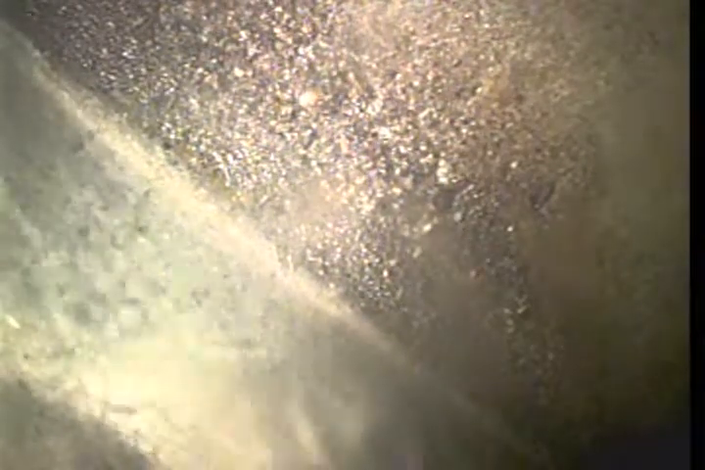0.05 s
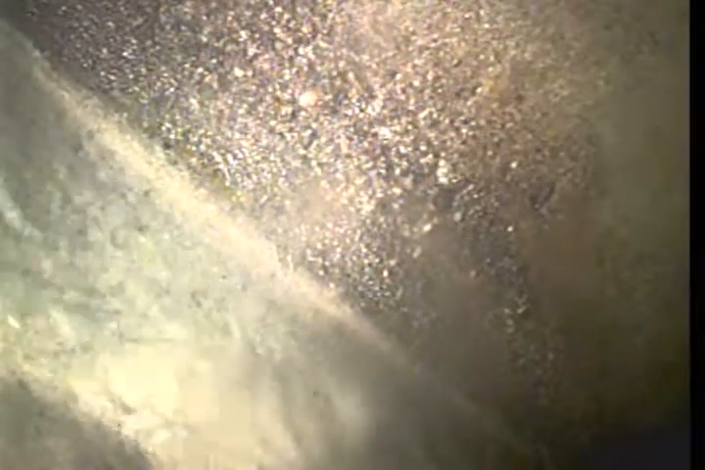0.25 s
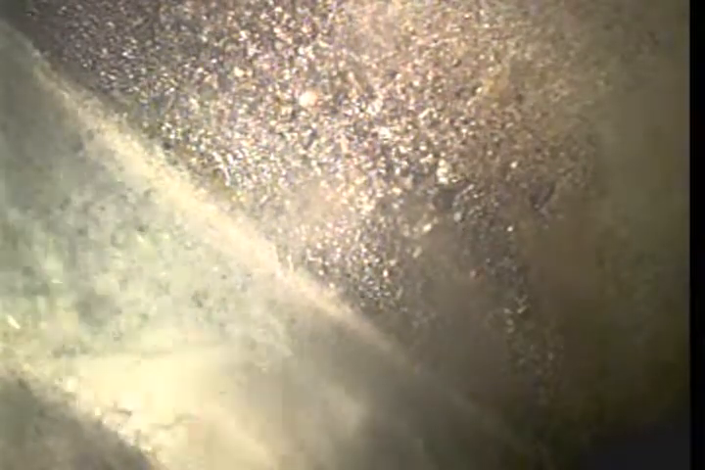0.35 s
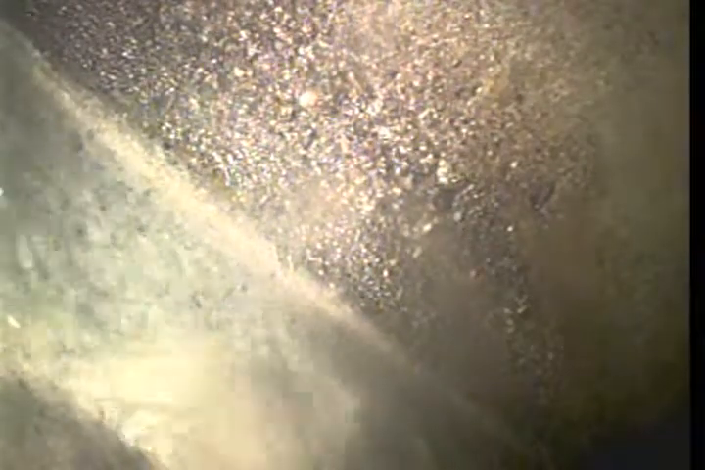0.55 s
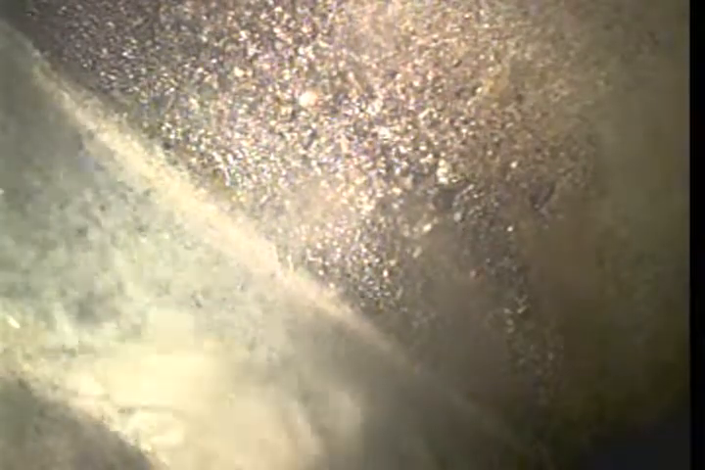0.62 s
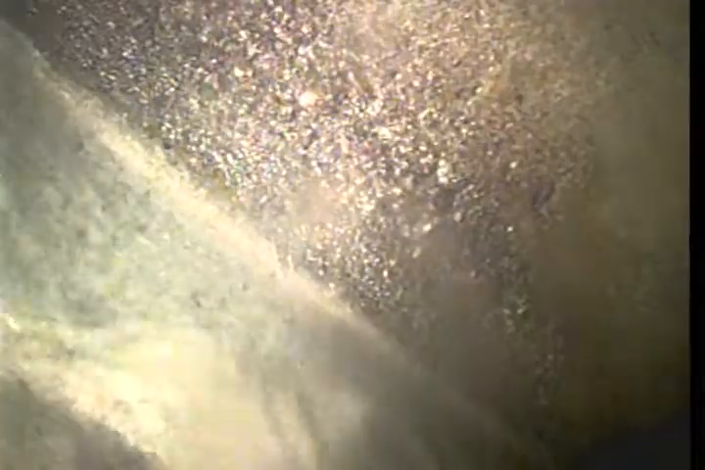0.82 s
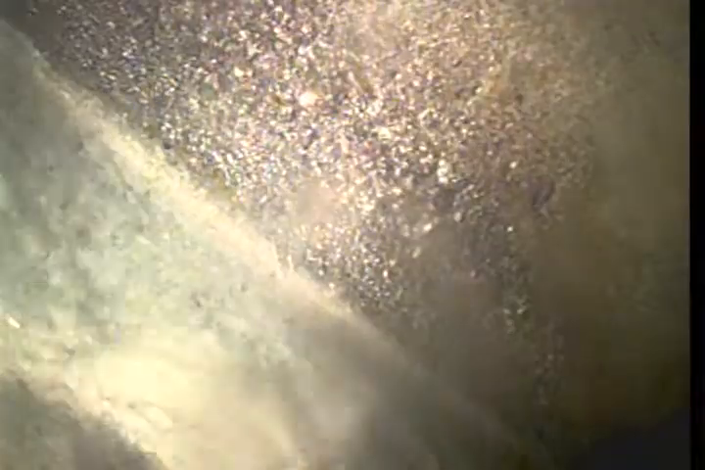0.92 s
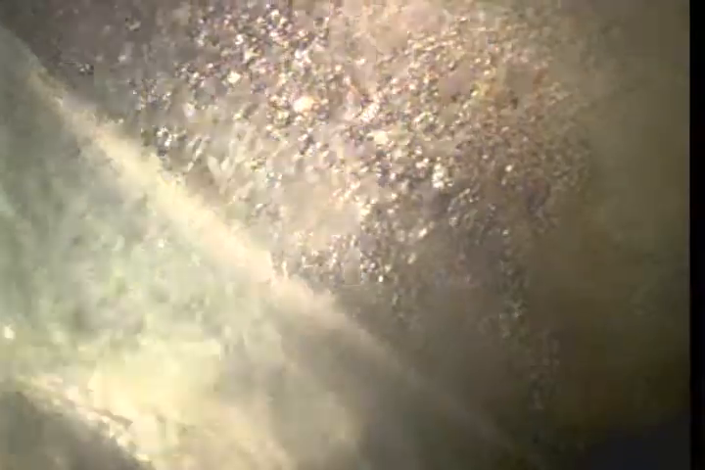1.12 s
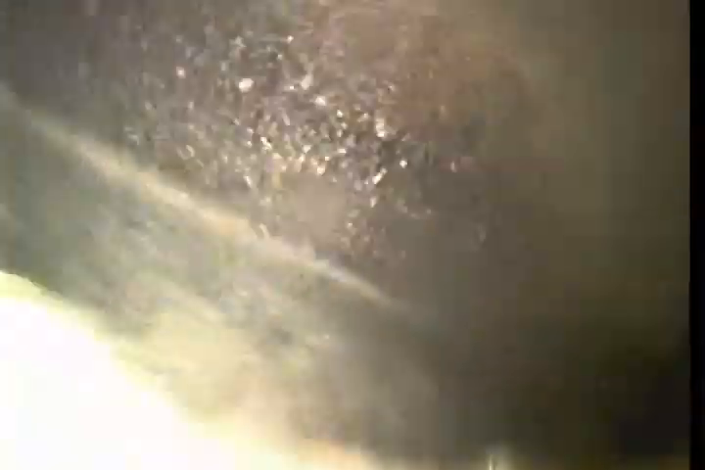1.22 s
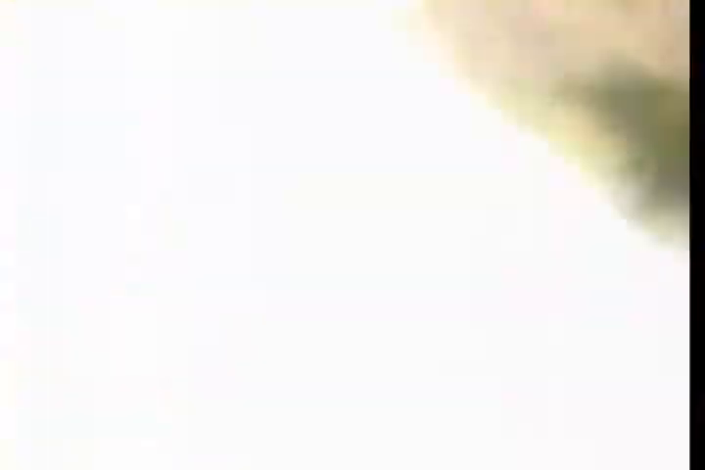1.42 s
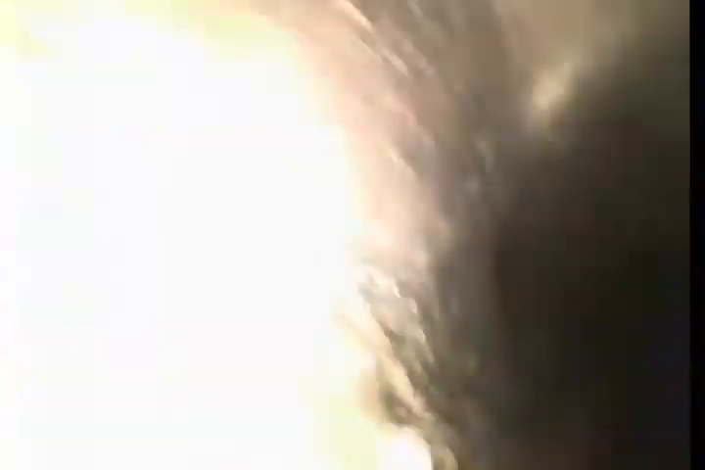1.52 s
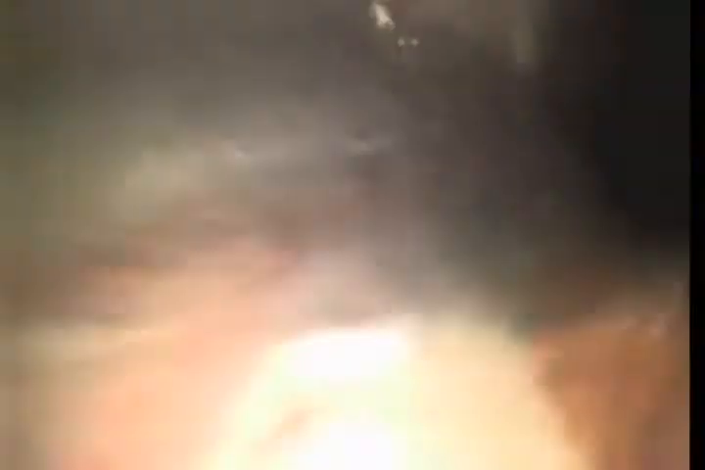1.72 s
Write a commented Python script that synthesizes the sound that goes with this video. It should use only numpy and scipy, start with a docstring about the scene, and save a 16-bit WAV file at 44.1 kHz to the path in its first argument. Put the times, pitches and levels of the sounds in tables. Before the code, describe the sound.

A push cable ticks twice against a drain pipe, then knocks hard with a low hollow boom that overloads the small muffled microphone; weaker bumps follow, then quiet sliding friction over hiss and a few dull taps.

```python
"""Cable drawn back through a drain pipe

A push cable clicks against its guide, bumps the reel's frame and makes the reel boom: decaying modes.
One sharp knock near 0.32 s does all three at once; hollow pipe resonances ring on as single sines.
From about 1.07 s the cable slides: coloured noise with two narrow resonances, over a hiss that rises again.
A narrow-band inspection recorder with a hissing floor picks it up and overloads on the knock."""
import sys
import numpy as np
from scipy.fft import rfft, irfft, next_fast_len
from scipy.io import wavfile
from scipy.ndimage import map_coordinates

SR = 44100
rng = np.random.default_rng(int(sys.argv[2]) if len(sys.argv) > 2 else 0)


def persist_wave(psi):
    """Save psi, clipped to +-1, as 16-bit WAV."""
    counts = np.round(np.clip(psi, -1, 1) * 32767).astype(np.int16)
    wavfile.write(sys.argv[1], SR, np.atleast_2d(counts).T)


N = 77175

RING_T = np.arange(SR // 2) / SR  # time axis of one contact, in seconds
TAIL_DB, TAIL_T60_S = -18, 0.29  # weak ring-out of a contact, relative to its peak


def amp(db):
    """Level law: decibels to an amplitude ratio."""
    return 10 ** (np.asarray(db) / 20)


def unit(x):
    """Normalization by mean power: scaled to rms 1."""
    return x / np.sqrt(np.mean(x ** 2) + 1e-20)


def curve(rows):
    """Linear interpolation: one value per sample from (seconds, value) rows."""
    return np.interp(np.arange(N) / SR, *np.transpose(rows))


def filtered(x, response):
    """Linear filtering: the spectrum of x times a response of frequency."""
    padded = next_fast_len(len(x) + 8192)
    spectrum = rfft(x, padded) * response(np.fft.rfftfreq(padded, 1 / SR))
    return irfft(spectrum, padded)[:len(x)]


def noise(spectrum, size, shade=np.zeros_like):
    """Spectral shaping: white noise coloured by (Hz, dB) rows plus a shade in dB, at rms 1."""
    f, db = np.transpose(spectrum)

    def colour(hz):
        level_db = np.interp(np.log(hz + 1), np.log(f), db) + shade(hz + 1)
        return amp(level_db) * (hz < 1.1 * f[-1])

    return unit(filtered(rng.standard_normal(size), colour))


def ring(modes, wash, wash_db, shade=np.zeros_like):
    """Modal superposition: sines of random phase in a wash of denser modes, not yet decaying."""
    tones = sum(amp(db + shade(hz)) * np.sin(2 * np.pi * (hz * RING_T + rng.random()))
                for hz, db in modes)
    dense_modes = noise(wash, len(RING_T), shade)
    return unit(unit(tones) + amp(wash_db) * dense_modes)


def envelope(rise, t60, hold=0, tail_db=TAIL_DB):
    """Two-stage exponential decay: linear rise, hold, main decay and a weak tail, added in power."""
    after = np.maximum(RING_T - rise - hold, 0)

    def fade(seconds):
        return np.exp(-np.log(1000) * after / seconds)  # falls 60 dB in the given seconds

    return np.minimum(RING_T / rise, 1) * np.hypot(fade(t60), amp(tail_db) * fade(TAIL_T60_S))


def add(out, s, sound):
    """Linear superposition: mixes a sound in at s seconds."""
    part = out[round(s * SR):][:len(sound)]
    part += sound[:len(part)]


def hiss():
    """Stationary noise under a gain curve: a hiss that drifts in level over a steady rumble."""
    # Spectra of the hiss and of the low rumble. Each row: frequency in Hz, density in dB per Hz.
    hiss_colour = [(600, -17), (1420, -5), (1750, -15.5), (2300, -6.5), (2770, -2.5), (3100, -5.5),
                   (3600, -11), (4000, -22), (4400, -33)]
    rumble_colour = [(30, -3), (100, -2.5), (200, 4.5), (300, -1), (600, -6.5), (790, -7.5), (1150, -17),
                     (1420, -24), (1900, -28.5)]
    # Course of the hiss. Each row: time in seconds, level in dB.
    hiss_level = [(0, -60.5), (.12, -57.5), (.4, -53), (.55, -51.5), (.82, -50), (.95, -40.5), (1.04, -65),
                  (1.75, -55)]
    rumble_db = -52.5
    floor = amp(curve(hiss_level)) * noise(hiss_colour, N)
    return floor + amp(rumble_db) * noise(rumble_colour, N)


def clicks():
    """Impact excitation: the cable ticks on the guide and rings it; each tick has its own upper limit."""
    # Hard contacts. Each row: start in seconds, rise in seconds, main decay t60 in seconds,
    # level of the guide's ring in dB, level of the cable's tick in dB, top of the tick in Hz.
    contacts = [(0.142, 0.00054, 0.016, -19.5, -24, 3500), (0.1451, 0.0011, 0.073, -26, -23, 3400),
                (0.219, 0.0086, .09, -32, -36, 3500), (0.2314, 0.0051, 0.056, -16, -21, 3540),
                (0.242, 0.01, 0.14, -23, -25.5, 3550), (0.314, 0.0025, 0.11, -28, -24.5, 4000),
                (.319, .003, 0.086, -24, -15.5, 4300), (0.329, .002, 0.098, -19, -14.5, 4200),
                (.362, 0.0041, 0.056, -34, -23.5, 4080), (.609, .004, 0.2, -44.5, -41, 3490),
                (.650, .002, 0.027, -33.5, -35, 3630), (.724, .001, 0.13, -41, -58.5, 3500),
                (.885, .02, 0.6, -45.5, -43, 3500), (.923, 0.011, 0.097, -26, -23, 4220),
                (1.668, .005, 0.03, -50, -48, 3450)]
    # Modes of the guide and the cable's own high modes. Each row: frequency in Hz, level in dB.
    guide_modes = [(790, -14), (876, -5.5), (985, 1), (1405, -2.5), (1575, -3), (1720, -4.5)]
    cable_modes = [(2675, -8.5), (2885, -1), (3075, -4.5), (3215, -0.5), (3446, -2), (3770, 0)]
    # Dense ringing of guide and cable. Each row: frequency in Hz, density in dB per Hz.
    guide_wash = [(30, -5), (250, -23), (450, -10.5), (620, -13), (860, -0.5), (1180, -9.5), (1450, -3.5),
                  (1750, -14), (2400, -15), (3600, -41.5)]
    cable_wash = [(300, -50.5), (1500, -10.5), (2200, -11), (2650, 2.5), (3000, 2), (3300, -0.5),
                  (3700, 3.5), (3950, -7.5), (4400, -9.5)]
    wash_db = 4  # dense ringing against the discrete modes, in both bodies
    rolloff = 14  # order of the fall above a tick's top
    out = np.zeros(N)
    for s, rise, t60, ring_db, tick_db, top_hz in contacts:
        shade = lambda hz: -20 * np.log10(np.hypot(1, (hz / top_hz) ** rolloff))
        guide = amp(ring_db) * ring(guide_modes, guide_wash, wash_db)
        tick = amp(tick_db) * ring(cable_modes, cable_wash, wash_db, shade)
        add(out, s, envelope(rise, t60, tail_db=-24) * (guide + tick))
    return out


def bumps():
    """Selective modal excitation: loops of cable bump the frame, each favouring modes near one pitch."""
    # Soft contacts. Each row: start in seconds, rise in seconds, main decay t60 in seconds,
    # level in dB, favoured frequency in Hz.
    contacts = [(.143, 0.0058, .06, -34.5, 532), (0.155, 0.006, 0.21, -32.5, 380),
                (.236, 0.04, .15, -30.5, 480), (.321, .004, 0.18, -12.5, 321),
                (.337, 0.0058, 0.14, -19.5, 567), (0.606, 0.0059, .13, -25.5, 340),
                (.65, 0.0015, 0.099, -26, 648), (.724, 0.0017, 0.1, -38.5, 640),
                (.875, 0.0032, 0.11, -29.5, 660), (.889, 0.011, 0.14, -31, 480),
                (.929, 0.0051, 0.28, -29, 370), (1.465, 0.0053, 0.036, -27, 700),
                (1.473, 0.0037, 0.2, -35, 350), (1.556, 0.0035, 0.12, -28.5, 440),
                (1.655, 0.0071, 0.75, -41.5, 400)]
    # Modes of the frame. Each row: frequency in Hz, level in dB.
    frame_modes = [(290, -1), (340, 0), (388, -2), (438, -1), (500, -11.5), (595, -12), (698, -2.5),
                   (785, -2), (825, -3.5), (1020, -9.5), (1390, -14.5)]
    # Dense ringing around them. Each row: frequency in Hz, density in dB per Hz.
    frame_wash = [(30, -14), (120, 4), (300, 3), (450, -0.5), (600, -6.5), (800, -3.5), (1100, -13),
                  (1600, -21), (2500, -19.5)]
    focus_db_per_oct = 5.5  # modes are excited less, the further they lie from the favoured pitch
    wash_db = -2  # dense ringing against the discrete modes
    out = np.zeros(N)
    for s, rise, t60, db, favoured_hz in contacts:
        shade = lambda hz: -focus_db_per_oct * np.abs(np.log2(hz / favoured_hz))
        frame = ring(frame_modes, frame_wash, wash_db, shade)
        add(out, s, amp(db) * envelope(rise, t60) * frame)
    return out


def hums():
    """Free decay of a resonance: single hollow modes of the pipe ring on after a contact."""
    # Each row: start in seconds, rise in seconds, main decay t60 in seconds, rms level in dB, pitch in Hz.
    resonances = [(.2325, 0.0065, 0.031, -17, 852.6), (.245, 0.016, 0.078, -26, 882.6),
                  (.279, 0.0042, 0.15, -26.5, 463), (.66, 0.063, 0.21, -44.5, 111.6),
                  (.886, .012, 0.29, -32.5, 815), (0.939, 0.028, 0.77, -43.5, 91.8)]
    out = np.zeros(N)
    for s, rise, t60, db, hz in resonances:
        tone = np.sqrt(2) * np.sin(2 * np.pi * hz * RING_T)  # rms 1
        add(out, s, amp(db) * envelope(rise, t60) * tone)
    return out


def booms():
    """Inharmonic modal decay: the reel's few low modes answer each jolt and hold while the cable drags."""
    # Jolts. Each row: start in seconds, rise in seconds, hold in seconds, reference t60 in seconds,
    # reference rms level in dB, reference pitch in Hz.
    jolts = [(0.311, 0.0069, 0.013, 0.026, -14, 240), (.321, 0.006, 0.0071, 0.032, -8, 276.3),
             (0.3451, 0.00098, .003, 0.015, -7, 245.7), (0.357, 0.0043, 0.0013, 0.011, -12, 231.6),
             (0.37, 0.0015, 0.002, 0.13, -10.5, 202.9), (0.48, 0.0033, 0.011, 0.15, -28.5, 182.3),
             (.564, 0.0032, 0.02, .14, -28, 191), (0.606, 0.0036, 0.023, 0.19, -28.5, 209.1),
             (0.723, 0.011, 0.02, .11, -35.5, 198), (0.894, 0.0057, 0.019, 0.12, -22, 197.5),
             (1.476, 0.0046, 0.023, 0.039, -32, 214), (1.561, 0.007, 0.00033, 0.41, -32.5, 207.8),
             (1.631, 0.0038, 0.012, 0.29, -37, 204), (1.68, 0.0077, 0.021, 0.25, -36.5, 212)]
    # Modes of the reel. Each row: multiple of the reference pitch, level in dB against the
    # reference level, multiple of the reference t60.
    reel_modes = [(1, -0.5, 0.97), (.53, -18, 1.8), (.68, -28.5, 3.6), (2.16, -21.5, 1.7)]
    out = np.zeros(N)
    for s, rise, hold, t60, db, hz in jolts:
        for ratio, mode_db, life in reel_modes:
            tone = np.sqrt(2) * np.sin(2 * np.pi * hz * ratio * RING_T)  # rms 1
            add(out, s, amp(db + mode_db) * envelope(rise, t60 * life, hold) * tone)
    return out


def sliding():
    """Friction noise: the moving cable rubs with a slight flutter and excites two narrow resonances."""
    # Spectrum of the rub. Each row: frequency in Hz, density in dB per Hz.
    rub_colour = [(40, -16.5), (130, -7), (195, 4), (300, -11.5), (390, 3), (520, -11.5), (680, -10.5),
                  (810, -1.5), (1130, -9.5), (1370, -5.5), (1750, -17.5), (2400, -12), (2950, -2.5),
                  (3200, -3), (3400, 3.5), (3600, -7), (3800, -5), (4000, -20), (4400, -24.5)]
    # Narrow resonances. Each row: centre in Hz, half-width at half amplitude in Hz,
    # level in dB against the rub.
    resonances = [(757, 23, -13.5), (3420, 250, -7)]
    # Strength of the sliding. Each row: time in seconds, level in dB.
    strength = [(1.065, -91), (1.087, -48), (1.17, -45), (1.26, -40.5), (1.4, -42), (1.52, -42),
                (1.6, -41.5), (1.67, -38), (1.75, -43)]
    flutter_db, flutter_per_s = 0.1, 96  # spread of the random level points, and their rate
    knots = rng.standard_normal(int(N * flutter_per_s / SR) + 4)
    flutter = map_coordinates(knots, [np.arange(N) * flutter_per_s / SR])  # smooth between knots
    squeaks = np.zeros(N)
    for hz, width, db in resonances:
        resonance = lambda f: 1 / (1 + ((f - hz) / width) ** 2)
        squeaks += amp(db) * unit(filtered(rng.standard_normal(N), resonance))
    level_db = curve(strength) + flutter_db * flutter
    return amp(level_db) * unit(noise(rub_colour, N) + squeaks)


def scene():
    """Superposition of pressures: all sources at one microphone."""
    return (hiss() + clicks() + bumps() + hums() + booms() + sliding())[None]


def record(dry):
    """Saturation and band limiting: a soft overload, a notch, a steep low-pass and an output that clips."""
    clip_level, knee = .69, 13  # ceiling of the overload, and its hardness
    notch_hz, notch_width_hz, notch_db = 1989, 148, -17.5
    edge_hz, edge_order = 4375, 59
    output_level = .7  # ceiling for what still overshoots
    top_hz = 16000
    loud = dry[0] / (0.5 + np.abs(dry[0] / clip_level) ** knee) ** (1 / knee)

    def band(hz):
        notch = amp(notch_db / (1 + ((hz - notch_hz) / notch_width_hz) ** 2))
        return notch / np.hypot(1, (hz / edge_hz) ** edge_order)

    clipped = np.clip(filtered(loud, band), -output_level, output_level)
    return filtered(clipped, lambda hz: hz < top_hz)[None]


dry = scene()
out = record(dry)
persist_wave(out)
```